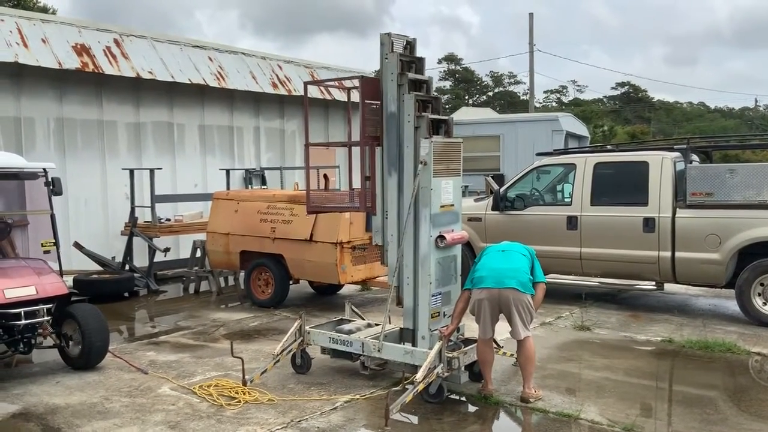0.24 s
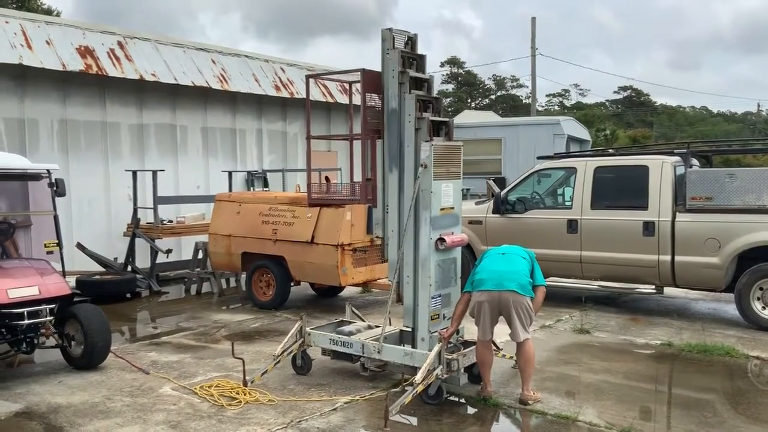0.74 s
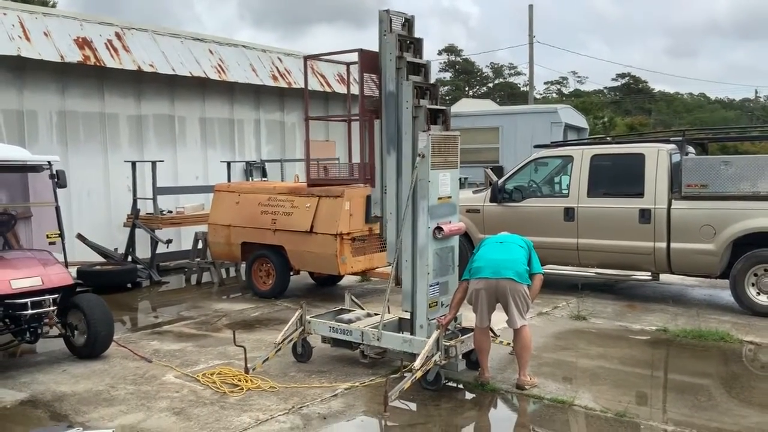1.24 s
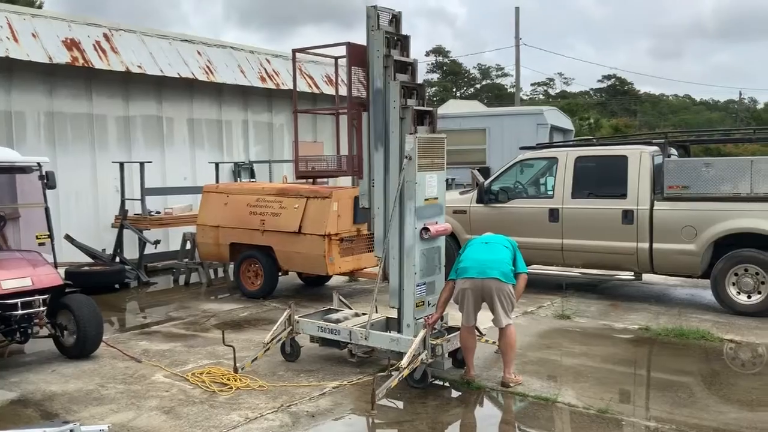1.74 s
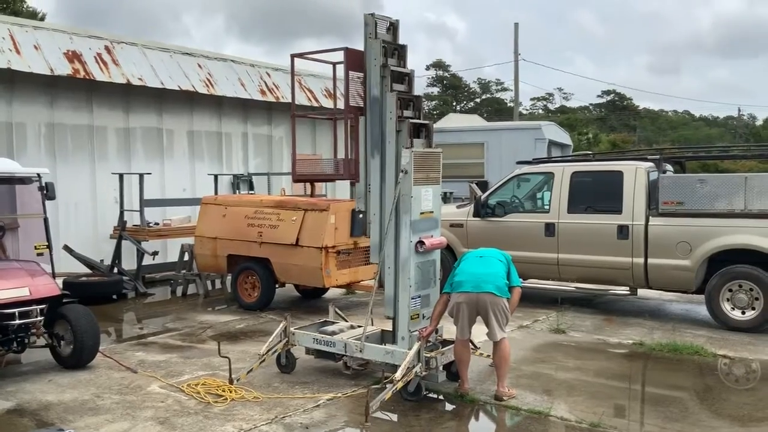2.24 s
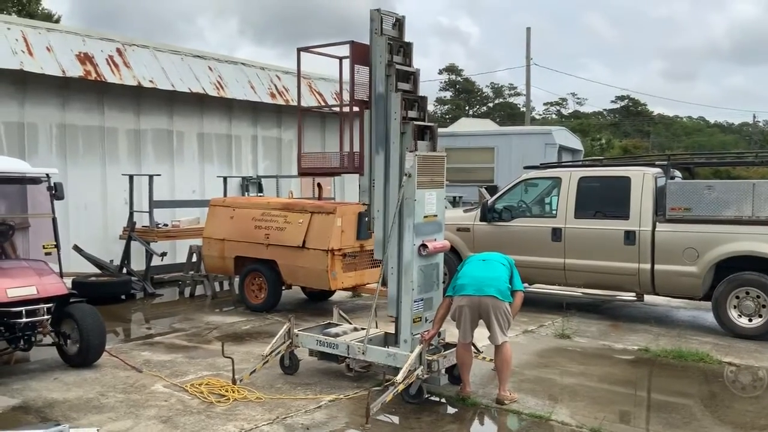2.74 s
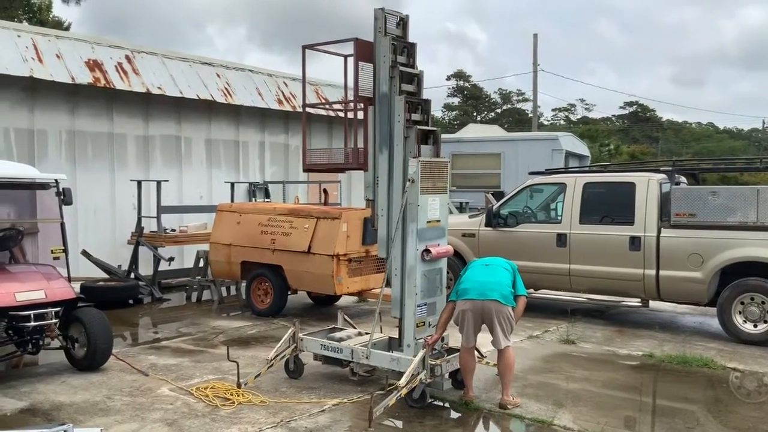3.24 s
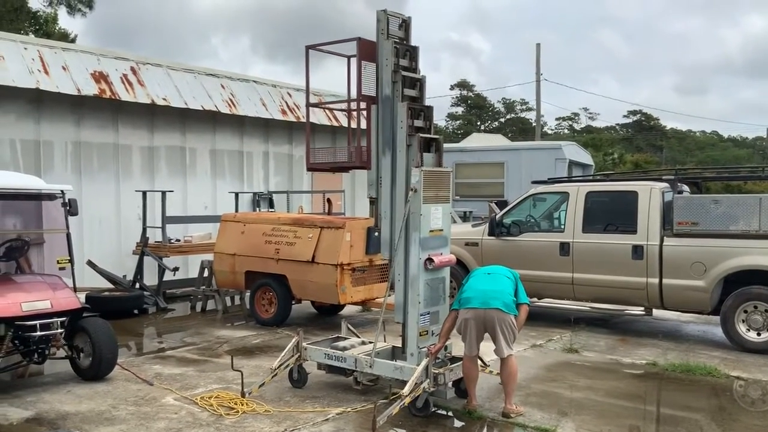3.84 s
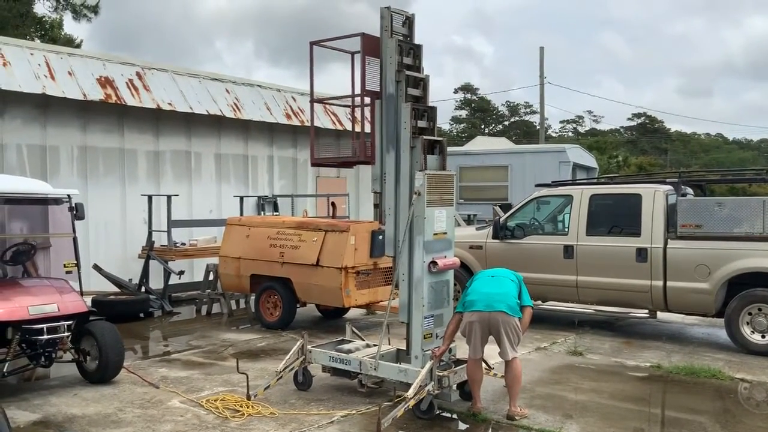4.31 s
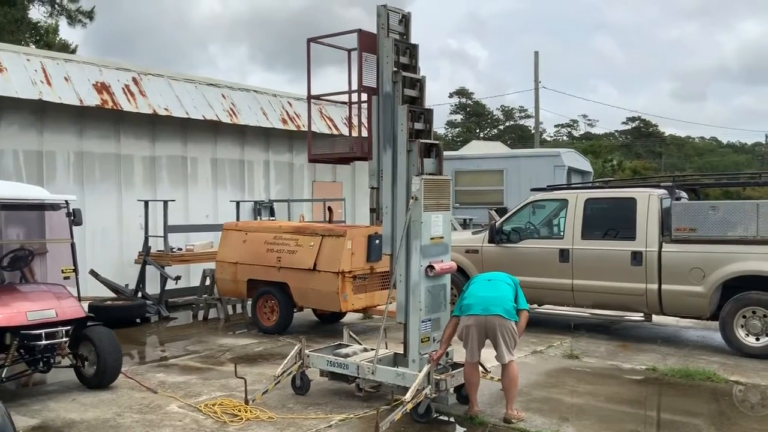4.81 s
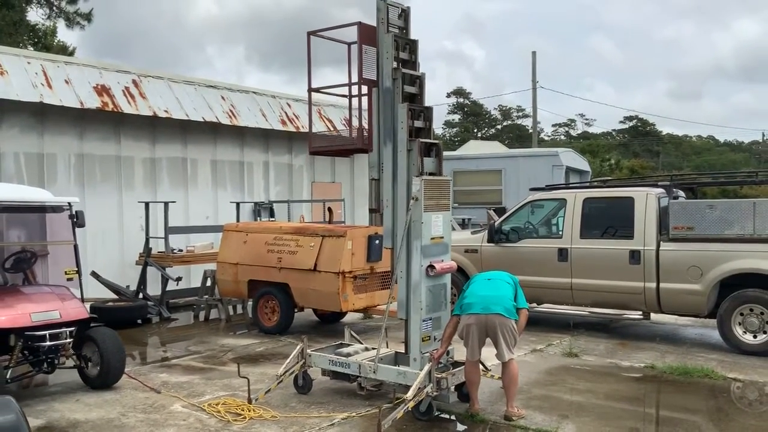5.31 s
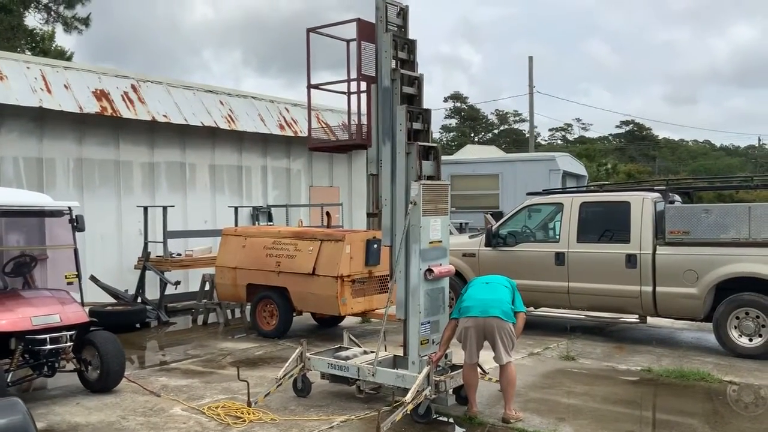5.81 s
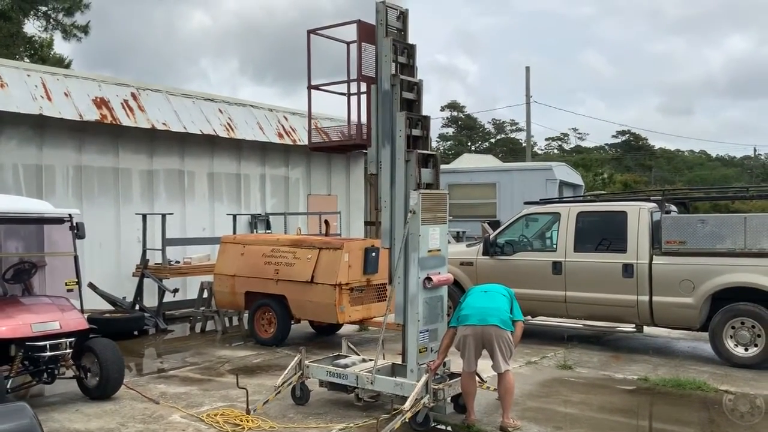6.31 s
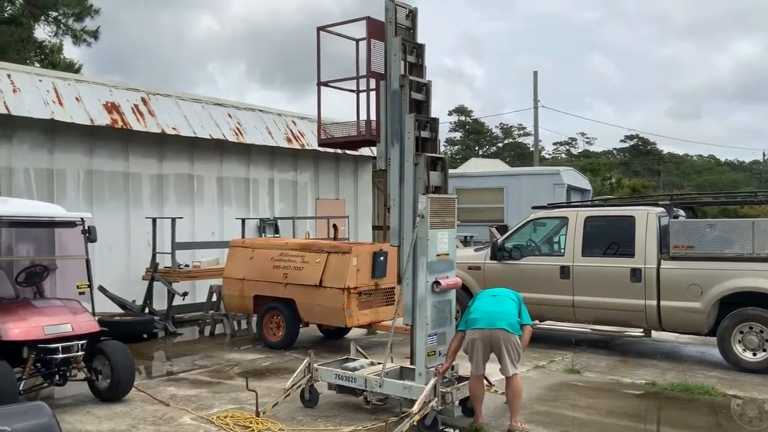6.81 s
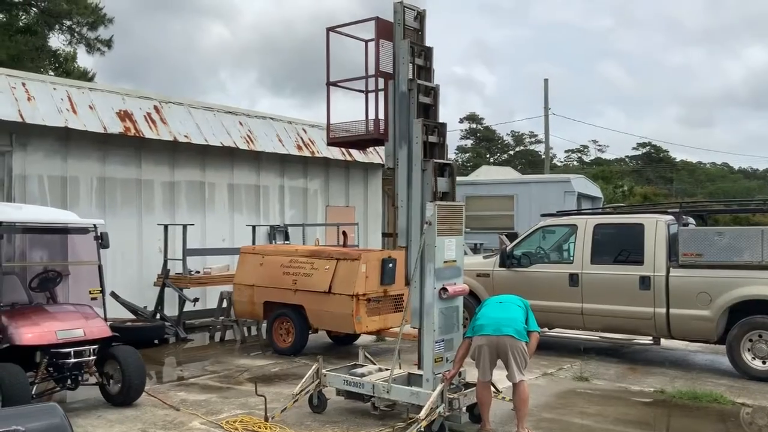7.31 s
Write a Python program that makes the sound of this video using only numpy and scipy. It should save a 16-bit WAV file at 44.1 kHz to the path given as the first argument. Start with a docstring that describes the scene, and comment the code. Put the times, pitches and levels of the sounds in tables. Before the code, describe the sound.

Outdoors in a yard, the pump motor of a rising lift hums the whole time, with a rapid metallic rattle and a soft hiss of flowing oil. A few sharp little ticks and faint scrapes come from the mast, and a far bird gives short whistles, mostly in the first half. Low wind rumbles against the microphone, buffeting it briefly at the beginning and again midway.

```python
"""A steady, slightly wavering whine with a fast rattle sounds over a soft rush in an open yard.
An electric motor turns an eleven-tooth gear pump that raises a telescoping mast: the teeth sound
harmonics of the shaft rate, oil rushes through the casing, and a loose part strikes twice a turn
and rebounds. The mast ticks and scrapes, a far bird calls, and wind rumbles and thumps on a pair
of microphone ports."""
import sys
import numpy as np
from scipy import signal
from scipy.fft import rfft, irfft, next_fast_len
from scipy.io import wavfile
from scipy.ndimage import uniform_filter1d

SR = 44100
rng = np.random.default_rng(int(sys.argv[2]) if len(sys.argv) > 2 else 0)


def store_wav(level_fs):
    """Save 16-bit WAV to argv[1]."""
    pcm = np.round(np.clip(np.atleast_2d(level_fs), -1, 1) * 32767)
    wavfile.write(sys.argv[1], SR, pcm.T.astype(np.int16))


N = 333396
TIME, SIZE = np.arange(N) / SR, next_fast_len(N + 4096)
BINS = np.fft.rfftfreq(SIZE, 1 / SR)
HUM_ORDER = 22  # cycles per shaft turn: twice the tooth rate

# State of the loose part: time_s, level_db, squeal_hz, second_blow_db, shift_turns, looseness (0-1)
LOOSE_PART = [(0.0, -54, 4255, -7, -0.062, 0.55), (1.2, -55, 4270, -6, 0, 0.1),
              (1.6, -53, 4270, -12, 0.00015, 0), (3.0, -53.5, 4280, 3, -0.021, 0.15),
              (4.5, -54.5, 4320, 2, -0.0073, 0.16), (5.8, -54, 4340, -1.5, 0, 0.2),
              (6.3, -56.5, 4270, -10, -0.0067, 0.3), (6.7, -56, 4350, 1, -0.039, 0.1),
              (6.85, -63, 4300, 1, -0.0077, 0.6), (7.15, -59, 4350, -4, 0.0081, 0.6),
              (7.56, -55.5, 4420, -10, 0.087, 0.4)]


def gain_of(db):
    """Amplitude ratio of a level in decibels."""
    return 10 ** (np.asarray(db) / 20)


def unit_rms(x):
    """Normalisation to an rms of 1."""
    return x / np.sqrt(np.mean(x ** 2) + 1e-20)


def spectrum(points):
    """Interpolation of a table over the bins, on a logarithmic frequency axis."""
    hz, value = np.transpose(points)
    return np.interp(np.log(BINS + 1), np.log(hz + 1), value)


def curves(rows):
    """Linear interpolation of each column over the times in the first."""
    time_s, *rest = np.transpose(rows)
    return [np.interp(TIME, time_s, column) for column in rest]


def filtered(x, response):
    """Linear filtering: the spectrum is multiplied by a frequency response."""
    return irfft(rfft(x, SIZE) * response, SIZE)[..., :N]


def wander(seconds):
    """Random fluctuation of rms 1: noise smoothed over the given time."""
    span = max(round(seconds * SR), 1)
    return unit_rms(uniform_filter1d(uniform_filter1d(rng.standard_normal(N), span), span))


def add(mix, start_s, sound):
    """Superposition of a sound on the mix from a given time."""
    part = mix[round(start_s * SR):][:len(sound)]
    part += sound[:len(part)]


def resonate(x, hz, width_hz):
    """Resonance of gain 1 by heterodyning: shift hz down to zero, smooth, shift back."""
    carrier = np.exp(2j * np.pi * np.cumsum(hz * np.ones(len(x))) / SR)
    pole = np.exp(-np.pi * width_hz / SR)
    return 2 * (carrier * signal.lfilter([1 - pole], [1, -pole], x / carrier)).real


def turning_noise(turns, repeat):
    """Partly periodic noise: a share repeat**2 of the power recurs on every shaft turn."""
    orders = np.exp(2j * np.pi * rng.random(851))
    pattern = unit_rms(irfft(orders * (np.arange(len(orders)) > HUM_ORDER)))
    periodic = pattern[(turns % 1 * len(pattern)).astype(int)]
    return repeat * periodic + np.sqrt(1 - repeat ** 2) * rng.standard_normal(N)


def ports(direct, other):
    """Partial coherence: the right port hears the sound earlier, blended with another path."""
    # Phase difference of the ports: frequency_hz, right_lead_rad
    phase_lead = [(30, 0.0), (750, 1.0), (1200, 3.2), (3950, 15.7), (4800, 22.0), (6600, 31.4),
                  (9850, 44.0), (15200, 66.0)]
    # Likeness of the ports: frequency_hz, coherence (0-1)
    likeness = [(60, 1), (450, 0.85), (1050, 0.16), (1500, 0.99), (2300, 0.83), (3200, 0.42), (5500, 0.97),
                (8200, 0.7), (10000, 1), (15000, 0.9)]
    # Level difference of the ports: frequency_hz, left_over_right_db
    balance = [(300, 1), (480, -8), (750, 1), (1200, 4), (1700, 0.5), (2900, 4), (3700, -1), (6000, -0.5),
               (7800, 1), (10000, 0)]
    coherence = np.clip(spectrum(likeness), 0, 1)
    tilt = gain_of(spectrum(balance) / 2)
    lead = np.exp(1j * np.interp(BINS, *np.transpose(phase_lead)))
    right = filtered(direct, coherence * lead / tilt)
    right += filtered(other, np.sqrt(1 - coherence ** 2) / tilt)
    return np.array([filtered(direct, tilt), right])


def audio_glitch(time_s=.952, length_s=.006, hum_cycles=.4):
    return hum_cycles / HUM_ORDER * np.clip((TIME - time_s) / length_s + .5, 0, 1)


def wind():
    """Turbulent pressure: a low rumble, nearly alike at both ports, and buffets of a cycle or two."""
    # Strength of the rumble: time_s, level_db
    gusts = [(0.0, -49), (0.57, -51), (0.99, -50.5), (1.39, -52.5), (1.74, -49), (2.91, -52), (3.05, -45),
             (3.64, -46.5), (3.79, -50.5), (4.42, -51), (5.1, -50.5), (5.62, -50), (6.61, -49), (6.89, -48),
             (7.18, -52), (7.56, -45)]
    # Rumble spectrum ahead of a 10 Hz high-pass: frequency_hz, level_db
    turbulence = [(8.8, -21), (15, -6), (43, 3), (91, 3), (118, -2), (145, -9), (220, -11.5), (260, -23.5),
                  (340, -64), (570, -120)]
    # Single buffets: time_s, level_db, pitch_hz
    buffets = [(0.124, -31, 51), (0.144, -29, 68), (0.169, -33, 84.5), (0.196, -28.5, 59), (0.239, -37, 60),
               (2.924, -32, 73), (2.945, -31, 104), (3.067, -35, 61.9), (3.199, -29, 69.4),
               (3.213, -28.5, 131), (3.25, -37, 55.4), (3.403, -23, 95), (3.415, -25, 60),
               (3.487, -28, 59.6), (3.497, -27, 105), (3.568, -29, 79), (3.752, -34, 85.4),
               (3.782, -30.5, 121)]
    common, side = rng.standard_normal((2, N))
    colour = gain_of(spectrum(turbulence)) * (BINS / 12) / (1 + BINS / 10)
    rumble = unit_rms(filtered(np.array([common + .31 * side, common - .31 * side]), colour))
    rumble *= gain_of(curves(gusts)[0] + 3.5 + 1.6 * wander(.019))
    push = np.zeros(N)
    for time_s, db, hz in buffets:
        cycles = np.arange(-1.2, 1.2, hz / SR)
        phase = 2 * np.pi * (cycles + .22)
        envelope = gain_of(db) * np.exp(-(cycles / .71) ** 2)
        add(push, time_s - .866 / hz, envelope * (np.cos(phase) + .16 * np.cos(3 * phase)))
    return rumble + np.array([push, np.roll(push, 12)]) * gain_of([[.4], [-.4]])


def bird(bend_hz_per_s2=60000, echo_s=.055, reverb_s=.16):
    """Frequency-modulated whistles, arched in pitch, with reflections from the sheds."""
    # Bird calls: start_s, length_s, top_hz, level_db
    calls = [(1.363, 0.1, 1740, -52), (1.647, 0.14, 1747, -46.5), (2.134, 0.15, 1714, -48.5),
             (2.624, 0.13, 1734, -44), (2.756, 0.02, 1747, -48), (5.196, 0.1, 1646, -57),
             (6.102, 0.11, 1663, -53)]
    out = np.zeros(N)
    for start_s, length_s, top_hz, db in calls:
        t = np.arange(0, length_s, 1 / SR)
        hz = top_hz - bend_hz_per_s2 * (t - .43 * length_s) ** 2
        flutter_db = 3 * unit_rms(uniform_filter1d(rng.standard_normal(len(t)), 250))
        fade_db = -4 * (t / length_s) ** 2
        envelope = gain_of(db + flutter_db + fade_db) * signal.windows.tukey(len(t), .2)
        call = np.sqrt(2) * envelope * np.sin(2 * np.pi * np.cumsum(hz) / SR)
        add(out, start_s, call)
        add(out, start_s + echo_s, gain_of(-11) * call)
    tail = rng.standard_normal(6000) * gain_of(-60 * np.arange(6000) / SR / reverb_s)
    return out + gain_of(-12) * signal.oaconvolve(out, tail / np.linalg.norm(tail))[:N]


def mast(attack_s=.0004, ring_s=.017):
    """Impact and friction on steel: returns the damped ringing of ticks and two paths of hiss."""
    # Impacts in the mast: start_s, level_db, pitch_hz
    ticks = [(1.198, -33, 3110), (1.803, -34, 3200), (2.042, -29, 2950), (2.062, -29, 2960),
             (2.1251, -33, 3030), (2.1425, -35, 3100), (2.2927, -31, 3170), (2.7533, -36, 3100),
             (2.8385, -35, 3000)]
    # Brief sliding contacts: start_s, level_db, length_s
    scrapes = [(.474, -62.5, .035), (.81, -66, .03), (1.265, -64, .03), (1.47, -68, .03),
               (2.038, -66, .035), (2.748, -63, .025), (4.115, -67, .03), (4.48, -69, .03),
               (5.038, -63, .05), (5.925, -66, .05), (6.34, -63, .03), (7.135, -63, .08), (7.43, -67, .03)]
    ring, hiss_level = np.zeros((2, N))
    t = np.arange(2000) / SR
    for start_s, db, hz in ticks:
        envelope = gain_of(db - 60 * t / ring_s) * np.minimum(t / attack_s, 1)
        add(ring, start_s, envelope * np.sin(2 * np.pi * hz * t))
        add(hiss_level, start_s - .003, gain_of(-63.5) * signal.windows.hann(700))  # puff of treble
    for start_s, db, length_s in scrapes:
        add(hiss_level, start_s - .005, gain_of(db) * signal.windows.tukey(round(length_s * SR), .6))
    hiss_level += gain_of(-78) * np.maximum(wander(.03), 0)  # faint flicker
    bright = (BINS / 2100) ** 2 / (1 + (BINS / 4900) ** 2) / np.sqrt(1 + (BINS / 22000) ** 4)
    return ring, filtered(hiss_level * rng.standard_normal((2, N)), bright)


def oil_rush(turns):
    """Broadband flow noise of the oil and motor fan, coloured by resonances of the casing."""
    # Spectrum of the flow: frequency_hz, density_db (power per Hz)
    flow_spectrum = [(100, -77), (300, -78), (800, -81), (1300, -82.5), (2200, -82), (2700, -86.5),
                     (3700, -88.5), (5300, -93.5), (6200, -94.5), (7400, -99), (9000, -93.5), (10000, -100),
                     (13400, -103), (15200, -99.5), (15700, -106)]
    # Casing resonances: centre_hz, width_hz, boost_db
    casing_modes = [(371.6, 18, 5), (401.4, 18, 7), (668, 18, 4.5), (1780, 78, 1), (2296, 300, 8),
                    (3175, 126, 5), (3950, 58, 9.5), (5470, 240, -2), (6550, 34, 7.5), (6570, 260, 4.5),
                    (10360, 1100, 2), (11400, 91, 11)]
    # Slow drift of the rush: time_s, gain_db
    drift = [(0, 1), (1.5, 1), (3, 0), (5.5, -1), (7.56, -0.5)]
    peaks_db = sum(db / (1 + (2 * (BINS - hz) / width) ** 2) for hz, width, db in casing_modes)
    flow = turning_noise(turns, repeat=.5)
    flow *= gain_of(curves(drift)[0] + .5 * wander(.43) + 1.04 * wander(.019))
    return filtered(flow, gain_of(spectrum(flow_spectrum) + peaks_db) * np.sqrt(SR / 2))


def fuzzy_partials(speed):
    """Narrowband noise on high harmonics of the shaft rate, rising and falling with the rattle."""
    # Band centres: shaft_order (cycles per turn)
    orders = (78, 132, 176, 209)
    # Noise bands on those orders: level_db, width_hz
    bands = [(-67.5, 6.2), (-65, 12), (-64.5, 15), (-72, 12)]
    rattle_db = curves(LOOSE_PART)[0]
    out = np.zeros(N)
    for order, (db, width_hz) in zip(orders, bands):
        level = gain_of(db + rattle_db - rattle_db.mean() + 2 * wander(.91))
        out += level * unit_rms(resonate(rng.standard_normal(N), order * speed, width_hz))
    return out


def rattle(speed, turns, scatter, slide_hz_per_turn=114, rasp_hz=4270, rasp_width_hz=250):
    """Impact excitation: two blows and a rebound each turn drive casing modes, a squeal and a rasp."""
    # Modes rung by the blows: centre_hz, width_hz, level_db
    modes = [(4200, 170, -13), (4270, 120, -25), (4940, 160, 10)]
    level_db, squeal_hz, second_db, shift, looseness = curves(LOOSE_PART)
    turn, angle = np.divmod(turns - .245 + .5, 1)
    angle -= .5  # in turns, zero about midway between the blows
    chance = looseness * scatter[turn.astype(int)].T  # a looser part strikes less evenly
    strength, late = gain_of(2.5 * chance[:2]), shift + .03 * chance[2:]
    first = strength[0] * np.exp(-((angle + .095 - late[0]) / .04) ** 2)
    second = gain_of(second_db) * strength[1] * np.exp(-((angle - .1 - late[1]) / .045) ** 2)
    rebound = gain_of(-3.5) * strength[0] * np.exp(-((angle - .39 - late[1]) / .045) ** 2)
    force = first + second + rebound + .41
    drive = force * turning_noise(turns, repeat=.6)
    ring = sum(gain_of(db) * resonate(resonate(drive, hz, width), hz, 3 * width)
               for hz, width, db in modes)
    cycles = (squeal_hz + slide_hz_per_turn * angle / 2) * angle / speed
    phase = 2 * np.pi * cycles + (.81 + .73 * looseness) * wander(.012)
    squeal = force * np.sqrt(np.cos(np.pi * angle).clip(0)) * np.sin(phase)
    rasp = (1 + force) * rng.standard_normal(N)
    for _ in range(2):
        rasp = resonate(rasp, rasp_hz, rasp_width_hz)
    pitched = gain_of(level_db) * (gain_of(-8.5) * unit_rms(ring) + gain_of(-3.5) * unit_rms(squeal))
    return pitched + gain_of(-62) * np.sqrt(.1 + looseness) * unit_rms(rasp)


def shaft_tone(turns, order, level, tilt_db, lead_rad):
    """One wavering harmonic of the shaft rate, with its own level and phase at each port."""
    phase = 2 * np.pi * (order * turns + rng.random()) + .0012 * order * wander(.011)
    pan = gain_of(np.outer([.5, -.5], tilt_db))
    pan /= np.sqrt(np.mean(pan ** 2, axis=0))
    waver = gain_of(.019 * min(order, HUM_ORDER) * wander(.07))
    return np.sqrt(2) * level * waver * pan * np.cos([phase, phase + lead_rad])


def gear_whine(turns, ramp_s=.14):
    """Periodic meshing of the teeth: a hum at twice the tooth rate and weaker tones that come and go."""
    # The main hum: time_s, level_db, left_over_right_db
    hum = [(0.0, -49.5, -2), (0.53, -48, -3), (1.12, -46, -1), (1.22, -46.5, -2), (1.52, -47, 0),
           (2.33, -43.5, -3), (3.16, -42.5, -0.5), (4.95, -43.5, -3.5), (5.05, -46.5, -9.5),
           (5.1, -44.5, -6.0), (5.37, -45, -9), (5.54, -46, -5), (6.0, -45.5, -9), (6.36, -45.5, -1.5),
           (7.01, -45.5, -5.5), (7.12, -46, -1), (7.22, -48.5, -7), (7.56, -48.5, -5)]
    orders = (11, 33, 55, 66, 73, 77, 78, 110, 112, 198)  # weaker tones, cycles per turn
    # Those tones at rest: level_db, left_over_right_db, right_lead_rad
    tones = [(-66, 0, -0.57), (-65, -19, 1.23), (-62, -1.5, -2.3), (-63.5, 12, -0.96), (-66, -2, -0.55),
             (-101, -1, 0.12), (-68, -1, 0.87), (-67.5, 7, -1.83), (-74, 11, -1.6), (-84, -1, -0.91)]
    # Stretches where a tone sings out, one list a tone: start_s, end_s, level_db
    swells = [
        [(0, .5, -62), (.5, 1.5, -54), (1.5, 2.4, -56.5), (2.4, 3.35, -53.5), (3.35, 4.1, -58), (4.1, 5.9, -63),
         (6.1, 7.25, -65)],
        [(-.2, .12, -59), (3.36, 3.5, -59), (2.3, 3.3, -68.5), (4.35, 5.0, -65), (6.36, 7.08, -57.5),
         (7.27, 7.8, -52)],
        [(1.2, 2.25, -61.5), (3.0, 4.4, -62), (5.6, 7.1, -60.5)],
        [(-.2, .7, -65), (.9, 2.9, -65.5), (2.9, 3.95, -62.5), (6.35, 6.8, -65), (7.17, 7.8, -58.5)],
        [(7.208, 7.8, -60.5)],
        [(-.2, .25, -56), (.46, .95, -51), (.95, 1.4, -52.5), (1.4, 1.92, -49.5), (1.92, 2.35, -53.5),
         (2.4, 3.3, -65), (6.05, 6.4, -59.5), (6.4, 6.75, -61), (6.77, 7.06, -53.5)],
        [(0.266, 0.427, -45.5)],
        [(2.35, 2.95, -64), (3.55, 4.5, -59.5), (4.6, 4.8, -64), (4.9, 5.6, -64.5), (5.7, 6.3, -75)],
        [(2.6, 3.8, -64.5), (4.2, 5.8, -67)],
        [(2.8, 3.5, -68), (4.2, 4.9, -73), (7.2, 7.8, -68)],
    ]
    hum_db, hum_tilt_db = curves(hum)
    out = shaft_tone(turns + audio_glitch(), HUM_ORDER, gain_of(hum_db), hum_tilt_db, lead_rad=.26)
    for order, (rest_db, tilt_db, lead_rad), stretches in zip(orders, tones, swells):
        level = np.full(N, gain_of(rest_db))
        for start_s, end_s, db in stretches:
            inside_s = np.minimum(TIME - start_s, end_s - TIME)
            level += gain_of(db) * np.clip(inside_s / ramp_s + .5, 0, 1)
        flutter = gain_of(1.3 * wander(.03))
        out += shaft_tone(turns, order, level * flutter, tilt_db, lead_rad)
    return out


def scene():
    """Superposition of all sources at the two ports; one shaft times every sound of the pump."""
    # Rotation of the shaft: time_s, speed_hz (turns per second)
    shaft = [(0.0, 26.14), (0.37, 25.85), (0.94, 26.32), (1.45, 26.16), (2.12, 26.275), (2.44, 26.465),
             (2.79, 26.455), (3.23, 26.575), (3.39, 26.645), (4.1, 26.41), (4.79, 26.65), (5.06, 26.355),
             (5.46, 26.485), (5.95, 26.39), (6.28, 26.25), (6.84, 26.145), (7.0, 26.2), (7.3, 26.75),
             (7.56, 26.75)]
    speed = curves(shaft)[0]
    turns = np.cumsum(speed) / SR
    scatter = rng.standard_normal((int(turns[-1]) + 2, 4))  # strength, lateness of both blows per turn
    ticks, hiss_paths = mast()
    direct, other = (hiss + oil_rush(turns) + fuzzy_partials(speed) + rattle(speed, turns, scatter)
                     for hiss in hiss_paths)
    events = bird() + ticks
    return wind() + ports(direct + events, other + np.roll(events, 130)) + gear_whine(turns)


def record(dry, edge_hz=15700):
    """Band limiting: a steep linear-phase low-pass removes the highest treble."""
    lowpass = signal.firwin(2047, edge_hz, window=("kaiser", 9), fs=SR)
    return signal.oaconvolve(dry, lowpass[None], "same")


dry = scene()
out = record(dry)
store_wav(out)
```